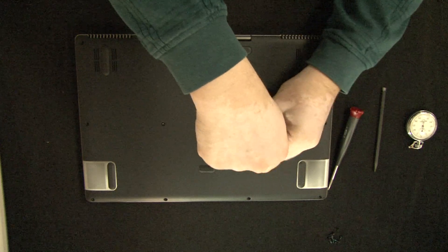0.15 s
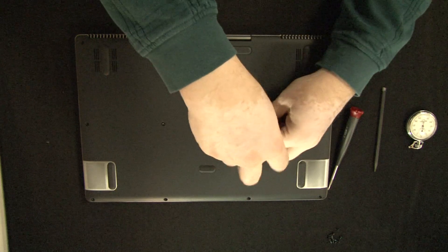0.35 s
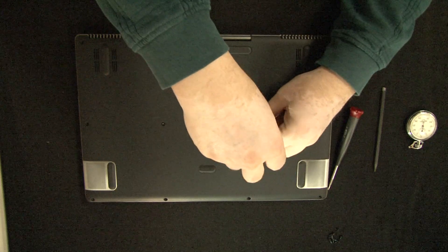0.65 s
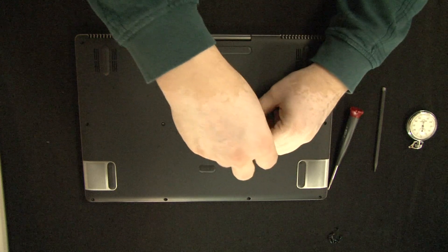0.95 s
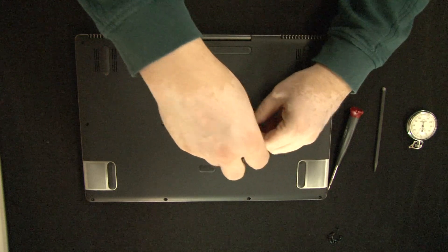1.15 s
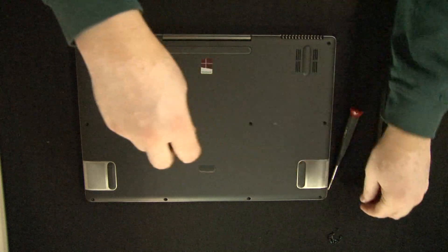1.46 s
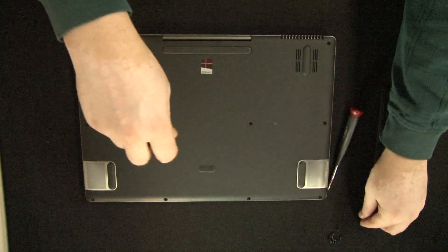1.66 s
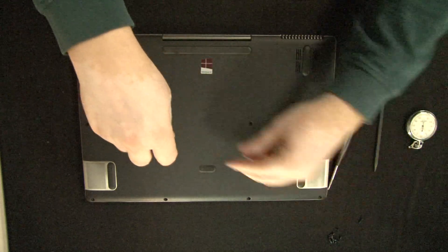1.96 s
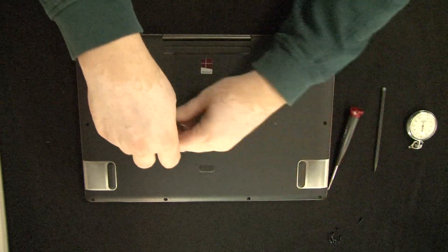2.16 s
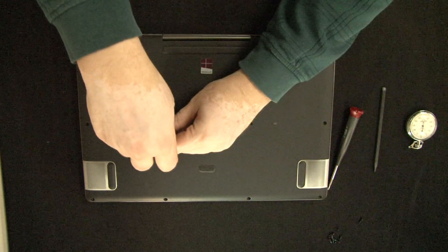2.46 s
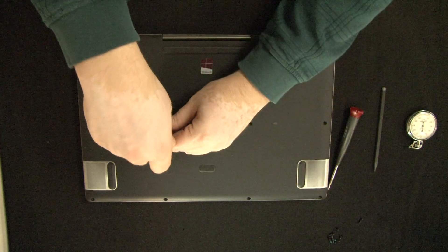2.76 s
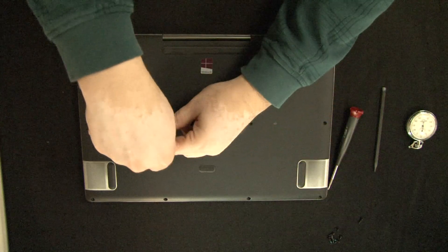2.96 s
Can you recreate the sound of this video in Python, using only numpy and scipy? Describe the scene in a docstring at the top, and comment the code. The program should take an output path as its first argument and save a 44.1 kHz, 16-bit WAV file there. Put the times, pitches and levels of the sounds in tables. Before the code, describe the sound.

A small screwdriver grinds, knocks and ticks in a screw on a laptop's plastic bottom for half a second, nearly silent afterwards, then a few hollow knocks; close mono microphone in a quiet room with faint hum.

```python
"""Small knocks, ticks and rattles, and a scrape at first: screws leave a laptop's bottom panel in a quiet room.
Blows ring the modes of the plastic panel and hollow screw well; rattling touches ring the steel
tip and screws; dense micro-clicks ring both as the tip grinds in the screw head.
Flickering noise bands make the room air, and noise-fed resonators a low machine hum below it."""
import sys
import numpy as np
from scipy import signal
from scipy.fft import rfft, irfft, next_fast_len
from scipy.io import wavfile

SR = 44100
rng = np.random.default_rng(int(sys.argv[2]) if len(sys.argv) > 2 else 0)


def voltage_ratio(level):
    """Linear amplitude factor for a level in decibels (scalar or array-like)."""
    return 10 ** (np.asarray(level, float) / 20)


def pcm_store(signal):
    """Save signal as 16-bit PCM."""
    levels = np.round(np.clip(np.atleast_2d(signal), -1, 1) * 32767)
    wavfile.write(sys.argv[1], SR, levels.astype(np.int16).T)


N = 136710   # length in samples

# modes of the plastic panel: (frequency [Hz], level [dB], t60 [s])
PANEL_MODES = [(367.5, -6, 0.12), (438, -6, 0.071), (520, -4, 0.063), (632, -13.5, 0.069), (829, -1, 0.047),
               (911, -5.5, 0.024), (1097, -4, 0.036), (1675, -12, 0.044), (1993, -7.5, 0.026),
               (2500, -6.5, 0.018), (2900, -14.5, 0.031), (3400, -6, 0.015)]
# modes of the hollow screw well: (frequency [Hz], level [dB], t60 [s])
WELL_MODES = [(1229, -11.5, 0.038), (1333, -2.5, 0.019), (1491, -5, 0.014)]


def rms_one(x):
    """Scale a signal to rms 1."""
    return x / np.sqrt(np.mean(x ** 2) + 1e-20)


def ring(clicks, hz, t60):
    """Two-pole resonator: a unit click sets off a decaying sine of height 1; t60 is at least 2 ms."""
    radius = voltage_ratio(-60 / (max(t60, .002) * SR))
    angle = 2 * np.pi * min(hz, .45 * SR) / SR
    feedback = [1, -2 * radius * np.cos(angle), radius * radius]
    return signal.lfilter([0, np.sin(angle)], feedback, clicks + 1e-18)


def strike(times, gains, modes):
    """Clicks at the times [s], with gains (clicks, modes), ring every mode of one body."""
    travel_s = .0007   # modes start within this time as the wave crosses the part
    starts = times[:, None] + rng.random(gains.shape) * travel_s
    at = np.minimum((starts * SR).astype(int), N - 1)
    out = 0
    for k, (hz, db, t60) in enumerate(modes):
        clicks = np.bincount(at[:, k], gains[:, k], N)
        out = out + ring(clicks, hz, t60) * voltage_ratio(db)
    return out


def crowd(low_hz, high_hz, db_at_1k, db_per_oct, t60_at_1k, count=64):
    """Many weak short modes (Hz, dB, t60 s), unevenly spread and closer in pitch toward the top."""
    damping = .6   # t60 falls as frequency to this power
    place = (np.arange(count) + rng.random(count)) / count
    hz = low_hz + (high_hz - low_hz) * place ** 1.5
    level = db_at_1k + db_per_oct * np.log2(hz / 1000)
    return list(zip(hz, level, t60_at_1k * (1000 / hz) ** damping))


def knocks(modes):
    """One blow each; tilt, well, bass and hollow ring depend on where and how the panel is hit."""
    # blows: (time [s], relative level [dB], tilt [dB per octave], screw-well ring [dB],
    #         bass ring [dB], hollow ring [dB])
    blows = [(0.017, -22, 3.5, 3, 4, -5), (0.057, -37, -2.5, 26, 0, -10), (0.066, -16.5, -1, 14, -13, -11),
             (0.102, -31, 2, 20, 4, -3), (0.119, -38, -2, 27, -10, -5), (0.153, -40, 1, 17, -14, -10),
             (0.178, -14, -9, 18, -7.5, -8), (0.197, -45, -3, 24, -11, 0), (0.23, -36, 0, 22.5, -7, 5),
             (0.253, -27, -3, 10, -8, -3), (0.2633, -24, -13.5, 16, -6.5, 8), (0.2795, -28, -8, 19, -3, -6),
             (0.2875, -0.5, -3, 5, -21.5, 0), (0.293, -17.5, 6, 8, 5.5, -10),
             (0.3314, -15, -3.5, 16, -6.5, 2), (0.3407, -24, 0, 6, -11, -2), (0.401, -27.5, -5, 13, -10, 2),
             (0.434, -23, 2.5, 1, -3, 0), (0.446, -17, -2, -6, 1.5, -2),
             (2.2316, -6.5, -0.5, -21, -2.5, 5.5), (2.246, -22, -3.5, -3, 3, -13),
             (2.366, -34, -3, 0, 0, 4), (2.374, -30, -8, -1, -12, 10), (2.384, -13, 0, 11, 0, 4.5),
             (2.424, -25.5, -4.5, -8, -2.5, 0), (2.5425, -16.5, 0.5, 7, 0.5, 2),
             (2.564, -19, -0.5, 9, 0, 1), (2.7413, -23, 2.5, 6.5, -10, -1), (2.7443, -22.5, 2, 2, 10, 4.5),
             (2.878, -14, 1, 9, 1.5, 3.5)]
    bass_below_hz, hollow_below_hz = 700, 1000   # the hollow ring lies between the two
    soft_above_hz, soft_db_per_oct = 3750, -15.5   # the contact is too soft for the highest modes
    spread_db = 2.2   # mode strength varies from blow to blow
    s, db, tilt, well_db, bass_db, hollow_db = np.transpose(blows)[:, :, None]
    hz = np.array(modes)[:, 0]
    level = db - 16 + tilt * np.log2(hz / 1000)
    level = level + bass_db * (hz < bass_below_hz)
    level = level + soft_db_per_oct * np.log2(np.maximum(hz / soft_above_hz, 1))
    level = level + hollow_db * ((hz >= bass_below_hz) & (hz < hollow_below_hz))
    level[:, :len(WELL_MODES)] += well_db   # the well's modes come first
    # well and main panel modes start with the same sign, the crowd with either sign
    is_main = np.arange(len(modes)) < len(WELL_MODES + PANEL_MODES)
    sign = np.where(is_main, 1, np.sign(rng.standard_normal(level.shape)))
    level = level + spread_db * rng.standard_normal(level.shape)
    return strike(s[:, 0], voltage_ratio(level) * sign, modes)


def ticks(modes, count=6):
    """Each steel tick is a first touch and a few weaker touches scattered within a short rattle."""
    # ticks: (time [s], relative level [dB], favoured pitch [Hz], tilt [dB per octave], shank ring [dB])
    touches = [(0.0174, -28.5, 5350, 7.5, 15), (0.0488, -30.5, 2900, 3, -3), (0.058, -23.5, 2500, 5.5, -23),
               (0.0824, -53, 9000, 4, 10), (0.1007, -34.5, 3600, 4, -1), (0.12, -31, 3540, -1, 12),
               (0.1511, -26, 5760, -4, 13), (0.1573, -30, 3600, 8, 13), (0.163, -30.5, 2870, 1, 14),
               (0.179, -21, 2750, -5, 1), (0.195, -28.5, 3340, 6, -5), (0.2254, -24, 3400, 3.5, -16),
               (0.2296, -20.5, 6500, 5, -23), (0.254, -30, 3730, -1, 0), (0.262, -32, 3830, 0, -3),
               (0.2722, -25.5, 5260, 6, -33), (0.287, -24, 2820, 12, -14), (0.307, -30.5, 2450, 2, 5),
               (0.394, -33, 2450, 2, 3), (0.4008, -34.5, 3440, 1, -3), (0.432, -29.5, 4930, 10, 2),
               (0.444, -31, 2580, 7, 0), (0.493, -38.5, 3120, 8, -15), (0.519, -32, 3560, 10.5, -14),
               (0.536, -43, 3180, 13, -8), (0.5433, -39.5, 4070, 11, -1), (0.556, -42, 3680, 10, -9),
               (0.5624, -45, 12300, 8, -2), (0.579, -53, 3380, 12, 4), (0.74, -55, 4030, -6, 0),
               (0.7514, -48, 4000, 0, 11), (0.7728, -49, 3370, 2, 0), (0.839, -48, 4700, 5, 0),
               (0.847, -46, 3580, 8, -2), (0.8602, -42, 3610, 9, -7), (0.876, -48, 3660, 9.5, -5),
               (1.0166, -47.5, 4970, 1, 0), (1.0253, -51.5, 3740, 7, -4), (1.431, -41.5, 4250, 3, -14),
               (1.4812, -50.5, 3700, 5, -1), (1.765, -54, 4500, -5, 0), (2.127, -59.5, 2280, -17, 0),
               (2.26, -45, 2530, -10, 0), (2.312, -49.5, 2660, -9, 0), (2.384, -28.5, 4380, 1, -13),
               (2.7676, -43, 2640, 4, 0), (2.8778, -30.5, 4400, -3.5, -7), (2.9572, -51, 2270, -9, 0),
               (3.0028, -42, 2650, -4, 5), (3.016, -33, 2570, -9.5, 10), (3.0225, -34.5, 3400, 0, -4),
               (3.05, -34.5, 2450, -3.5, -10)]
    rattle_s, spread_db = .0045, 3.0
    peak_db, peak_oct = 11, .22   # boost and reach of the favoured pitch
    shank_hz, shank_oct = 9300, 0.19   # the shank's high ring
    s, db, top_hz, tilt, shank_db = np.transpose(touches)[:, :, None]
    hz = np.array(modes)[:, 0]
    late = rng.random((len(touches), count)) * (np.arange(count) > 0)   # 0 = first touch
    colour = tilt * np.log2(hz / 4000)
    colour = colour + peak_db * np.exp(-(np.log2(hz / top_hz) / peak_oct) ** 2)
    colour = colour + shank_db * np.exp(-(np.log2(hz / shank_hz) / shank_oct) ** 2)
    chance = rng.standard_normal((len(touches), count, len(modes), 2))
    touch_db = db - 17 - 11 * late
    level = touch_db[:, :, None] + colour[:, None] + spread_db * chance[..., 0]
    gains = voltage_ratio(level) * np.sign(chance[..., 1])
    times = s + late * rattle_s
    return strike(times.ravel(), gains.reshape(-1, len(modes)), modes)


def grind(panel, steel):
    """Dense uneven micro-clicks into panel, well and steel while the tip turns."""
    # grinding strength: (time [s], panel level [dB], steel level [dB])
    strength = [(0, -37, -53), (0.028, -38, -50), (0.044, -51, -73), (.075, -39, -58), (.095, -52.5, -75),
                (0.129, -41, -46), (.148, -50, -84), (.165, -39.5, -59), (.195, -35.5, -48),
                (.218, -53.5, -59), (.24, -38.5, -53), (.27, -29.5, -46.5), (0.308, -37.5, -50),
                (.35, -73, -62), (.39, -60, -55), (.45, -43.5, -79), (.48, -58.5, -70), (.53, -62, -62),
                (.6, -65, -79)]
    grains_per_s = 1700
    well_boost_db = 9   # the tip grinds inside the well, which rings stronger
    s, panel_db, steel_db = np.transpose(strength)
    t, out = np.arange(N) / SR, 0
    panel = [(hz, db + well_boost_db * (k < len(WELL_MODES)), t60)
             for k, (hz, db, t60) in enumerate(panel)]
    for db, modes in ((panel_db, panel), (steel_db, steel)):
        times = np.sort(rng.random(int(grains_per_s * N / SR))) * N / SR
        grain_db = 3.7 * np.minimum(rng.exponential(1, (len(times), 1)), 4)
        gains = voltage_ratio(grain_db) * rng.standard_normal((len(times), len(modes)))
        envelope = voltage_ratio(np.interp(t, s, db, right=-120))   # silent after the last point
        out = out + rms_one(strike(times, gains, modes)) * envelope
    return out


def room(x):
    """Reverberation: eighteen feedback delays, duller on each pass, computed on an FFT grid."""
    t60_s, wall_cut_hz = 0.36, 1290
    size = next_fast_len(N + SR)
    f = np.arange(size // 2 + 1) * SR / size
    response = 0
    for k, delay in enumerate(np.geomspace(.011, .041, 18)):   # seconds
        dulling = (1 + 1j * f / wall_cut_hz) ** .5
        loop = voltage_ratio(-60 * delay / t60_s) / dulling * np.exp(-2j * np.pi * f * delay)
        response = response + (-1) ** k * loop / (1 - loop)
    return irfft(rfft(x, size) * response, size)[:N]


def drift(rate_hz):
    """Slow random wander of rms 1: white noise through two equal low-pass poles."""
    pole = np.exp(-2 * np.pi * rate_hz / SR)
    noise = rng.standard_normal(N + SR)
    return rms_one(signal.lfilter([1], [1, -2 * pole, pole * pole], noise)[SR:])


def air(flicker_db):
    """Room air: half-octave noise bands, each flickering a little in level."""
    # colour of the air: (frequency [Hz], relative level [dB per Hz])
    air_colour = [(20, -19), (50, -8), (130, -3), (250, -10), (600, -12.5), (1200, -18.5), (2500, -22.5),
                  (4000, -29), (7000, -32), (11000, -38.5), (14500, -34.5), (15500, -44)]
    out, edges, white = 0, 22 * 2 ** np.arange(0, 9.7, .5), rng.standard_normal((2, N))
    hz, db = np.transpose(air_colour)
    for k, (low, high) in enumerate(zip(edges, edges[1:])):
        band_filter = signal.butter(2, [low, high], "band", fs=SR, output="sos")
        band = signal.sosfilt(band_filter, white[k % 2])   # neighbours use separate noises
        band_db = np.interp(np.log(low * high) / 2, np.log(hz), db)
        out = out + band * voltage_ratio(band_db + flicker_db * drift(6.5))
    return rms_one(out) * voltage_ratio(-53.5)


def hum():
    """Machine hum: noise keeps two resonators wavering; the low one is steady, the upper one swells."""
    # hum resonators, low then upper: (frequency [Hz], spread [Hz]); a wider spread rings shorter
    resonators = [(96, 67), (170, 4.9)]
    # swell of the upper hum: (time [s], level [dB])
    swell = [(0, -66.5), (1.4, -67.5), (1.55, -56), (1.7, -64), (1.82, -56.5), (2.02, -56), (2.2, -67),
             (3.1, -65)]
    low, upper = [rms_one(ring(rng.standard_normal(N), hz, 4.8 / spread)) for hz, spread in resonators]
    swell_db = np.interp(np.arange(N) / SR, *np.transpose(swell))
    return voltage_ratio(-61) * low + voltage_ratio(swell_db) * upper


def scene():
    """Bench sounds and their reverberation over the air and hum."""
    # modes of the steel tip and screw: (frequency [Hz], level [dB], t60 [s])
    steel_modes = [(2380, -13, 0.003), (3600, 2, .007), (4300, 11.5, 0.0019), (5320, -1, 0.013),
                   (7850, -9, 0.002), (8870, -9, 0.013), (12100, -14, 0.0085)]
    panel = WELL_MODES + PANEL_MODES + crowd(879.5, 13997, db_at_1k=-14.5, db_per_oct=-3, t60_at_1k=0.0742)
    steel = steel_modes + crowd(1976, 15006, db_at_1k=-6, db_per_oct=-3.0, t60_at_1k=0.0412)
    bench = knocks(panel) + ticks(steel) + grind(panel, steel)
    # the panel radiates little outside this band [Hz]
    radiation = signal.butter(3, (355, 9200), "band", fs=SR, output="sos")
    bench = signal.sosfilt(radiation, bench)
    mix = bench + voltage_ratio(-23) * room(bench) + air(flicker_db=0.9) + hum()
    return mix[None]   # one channel


def top_cut(x):
    """Nothing passes above the cut-off."""
    return signal.sosfilt(signal.butter(12, 15720, fs=SR, output="sos"), x)


def record(dry):
    """A steep low-pass takes the top down by 40 dB from 15.5 kHz."""
    low_pass = signal.cheby2(12, 40, 15500, fs=SR, output="sos")
    mix = signal.sosfilt(low_pass, dry)
    return top_cut(mix)


dry = scene()
out = record(dry)
pcm_store(out)
```